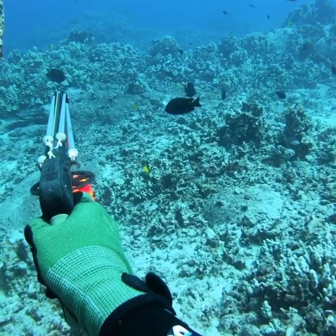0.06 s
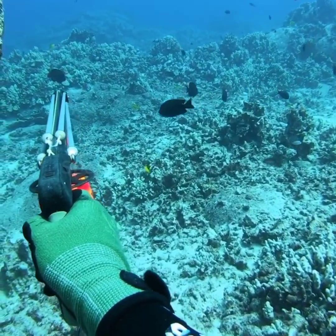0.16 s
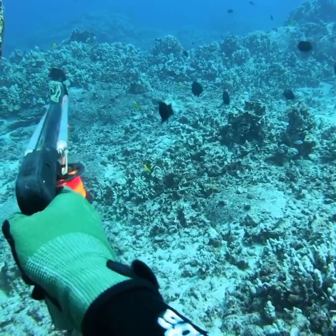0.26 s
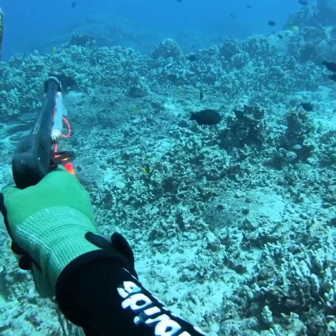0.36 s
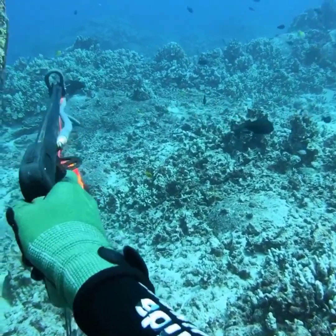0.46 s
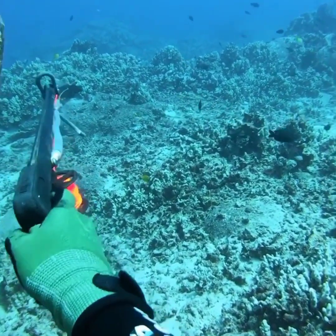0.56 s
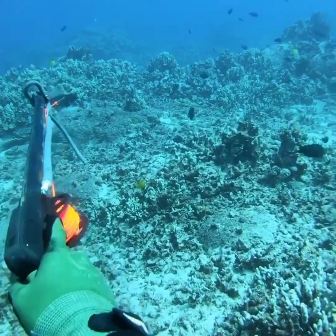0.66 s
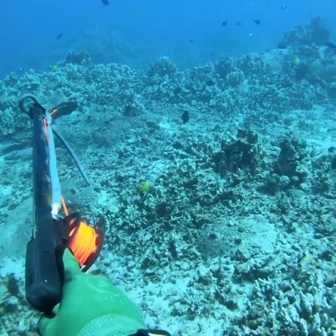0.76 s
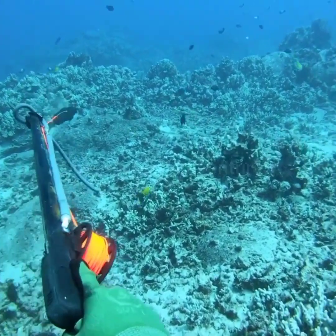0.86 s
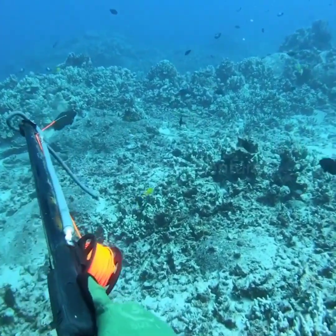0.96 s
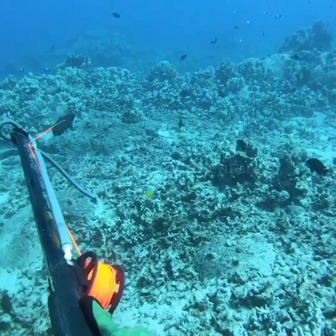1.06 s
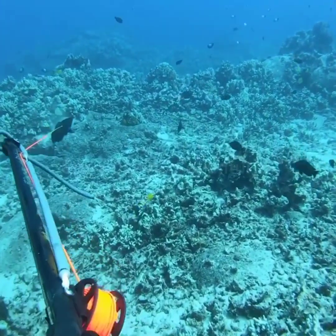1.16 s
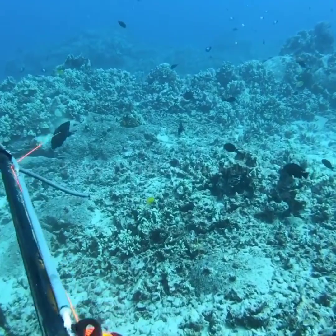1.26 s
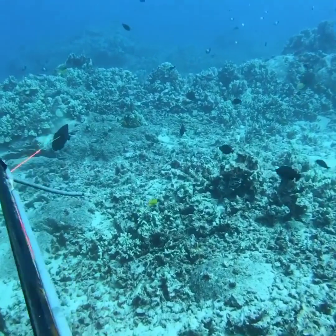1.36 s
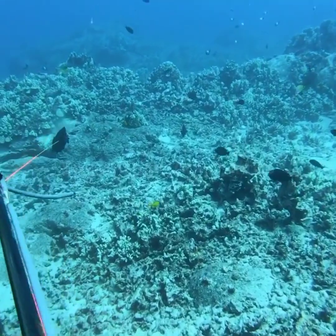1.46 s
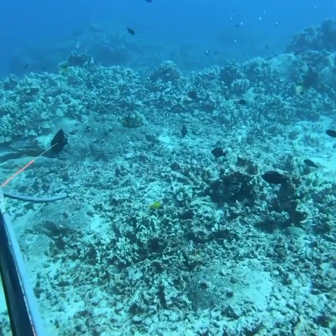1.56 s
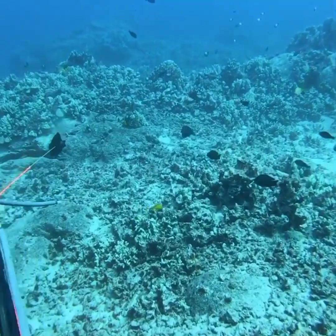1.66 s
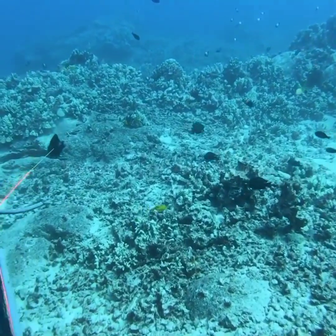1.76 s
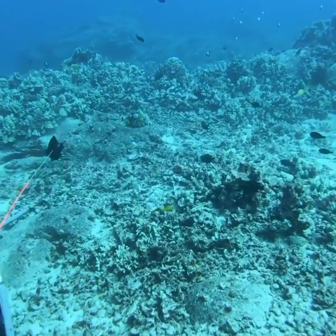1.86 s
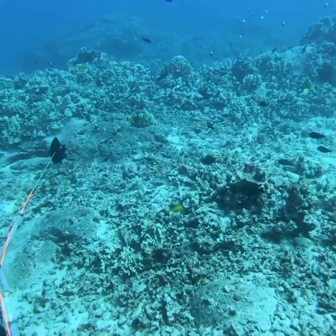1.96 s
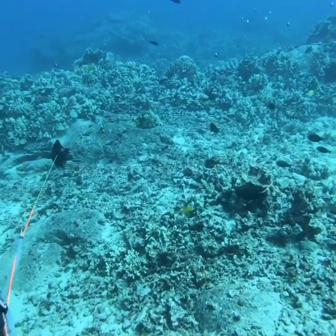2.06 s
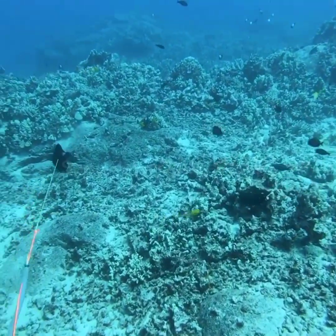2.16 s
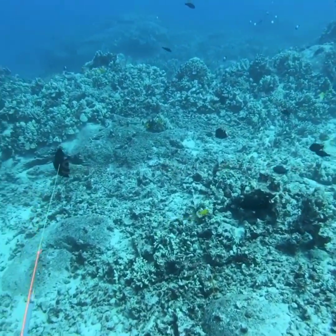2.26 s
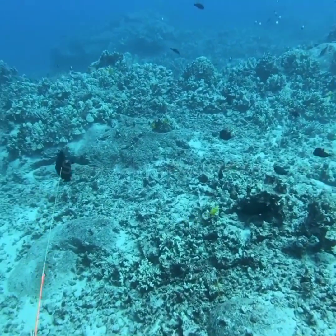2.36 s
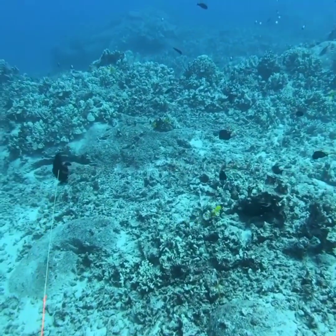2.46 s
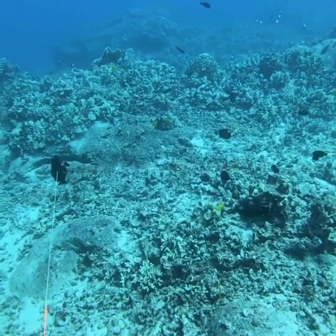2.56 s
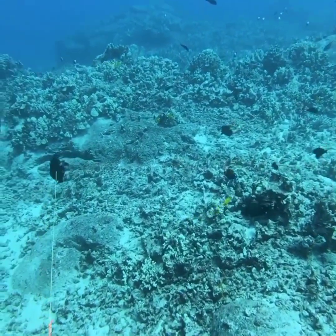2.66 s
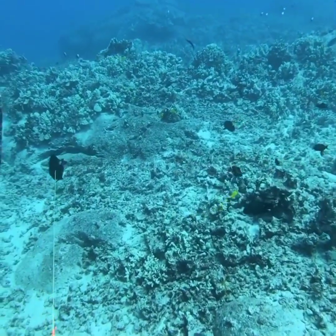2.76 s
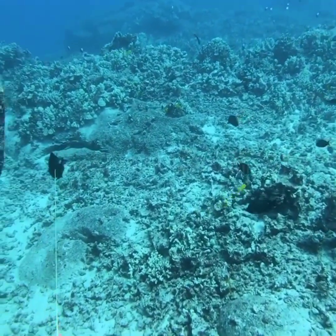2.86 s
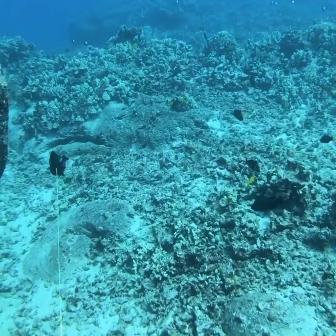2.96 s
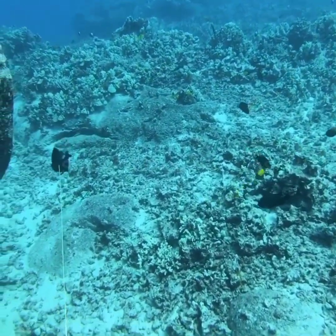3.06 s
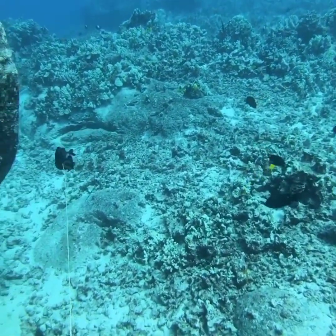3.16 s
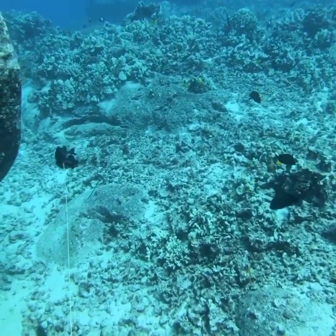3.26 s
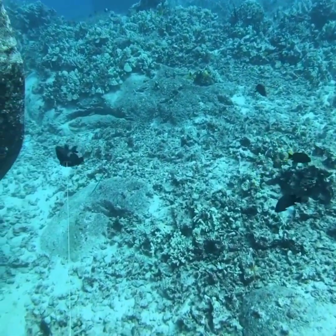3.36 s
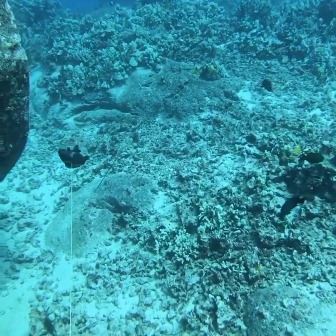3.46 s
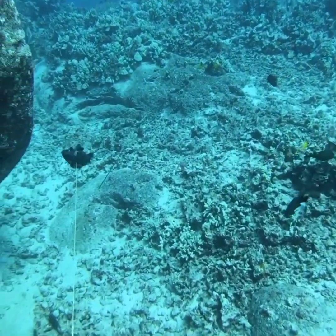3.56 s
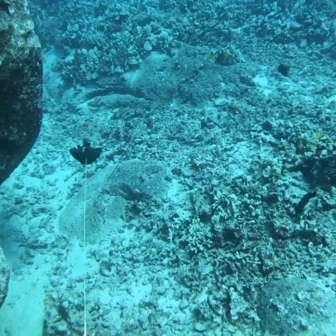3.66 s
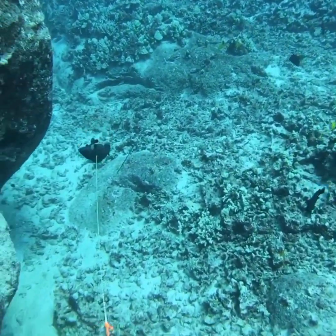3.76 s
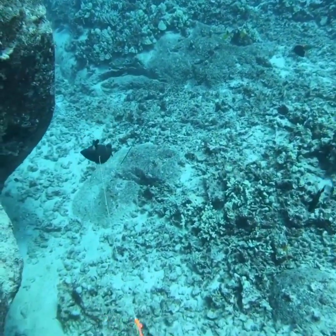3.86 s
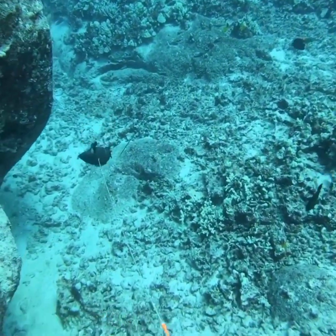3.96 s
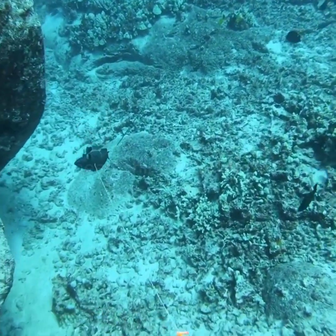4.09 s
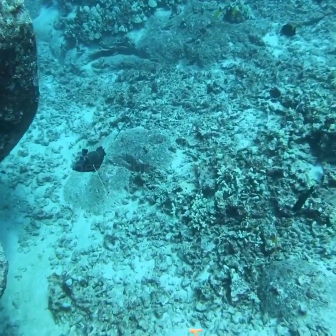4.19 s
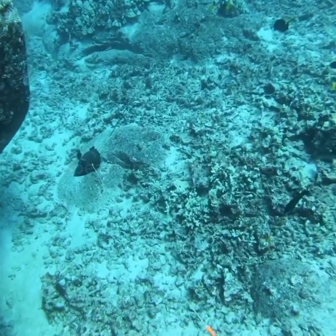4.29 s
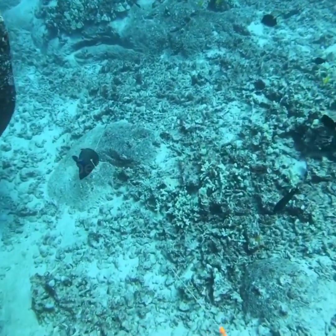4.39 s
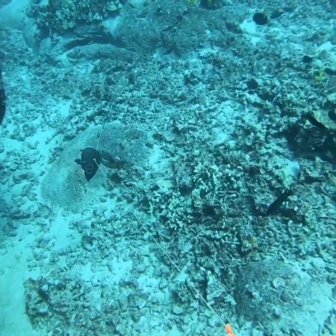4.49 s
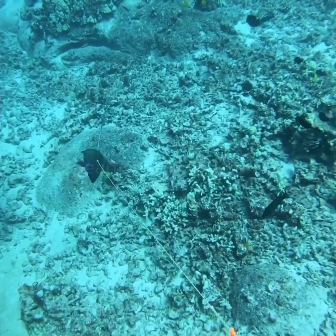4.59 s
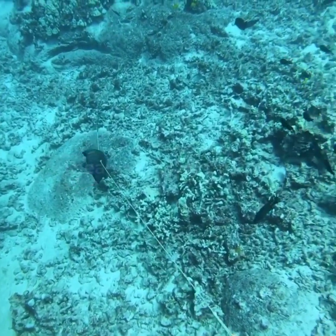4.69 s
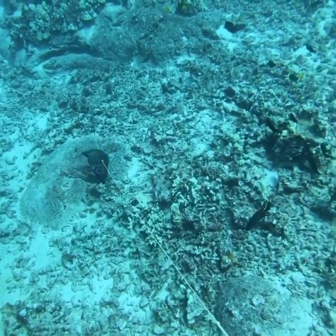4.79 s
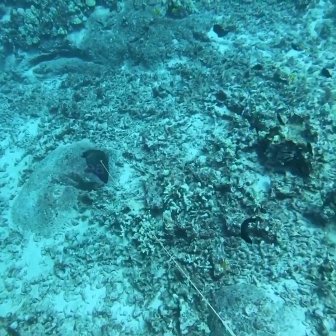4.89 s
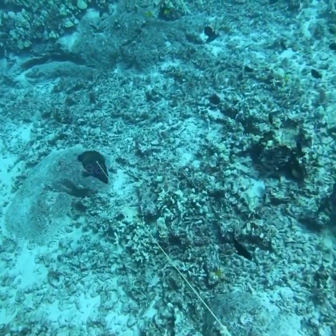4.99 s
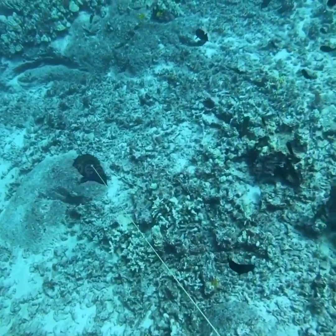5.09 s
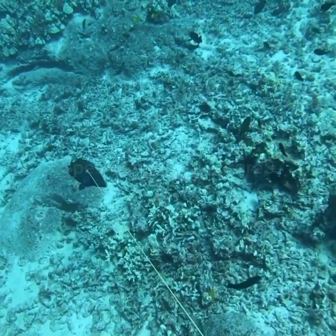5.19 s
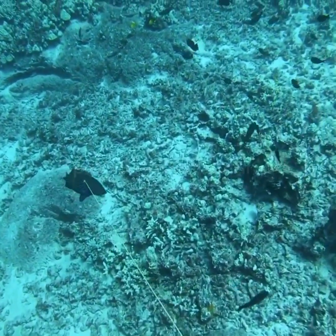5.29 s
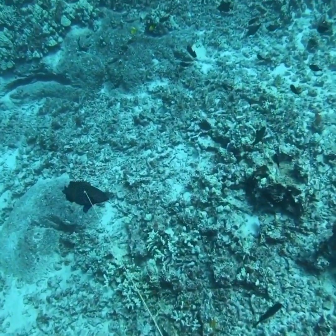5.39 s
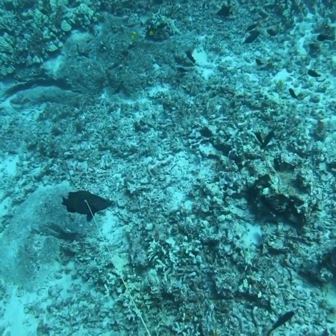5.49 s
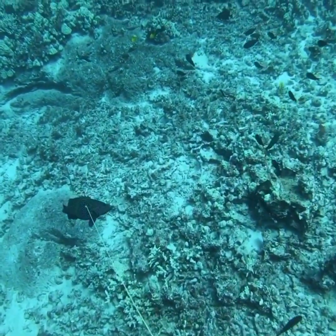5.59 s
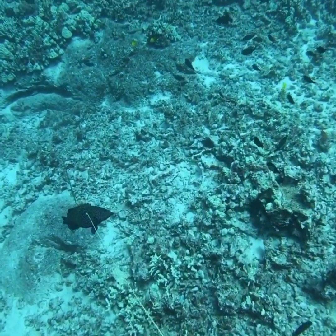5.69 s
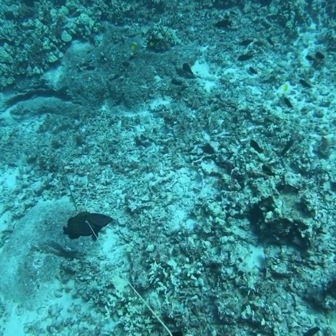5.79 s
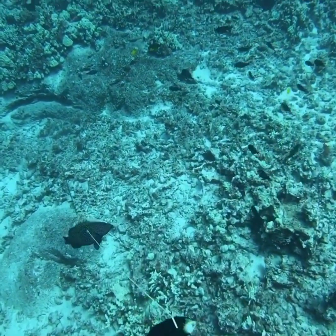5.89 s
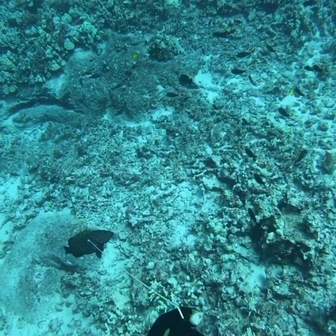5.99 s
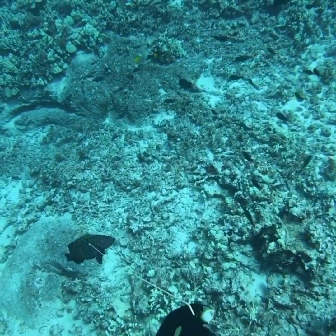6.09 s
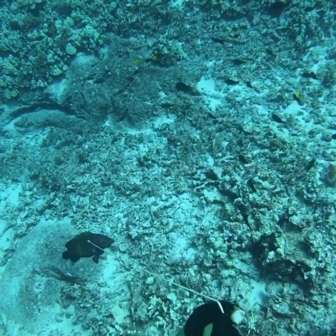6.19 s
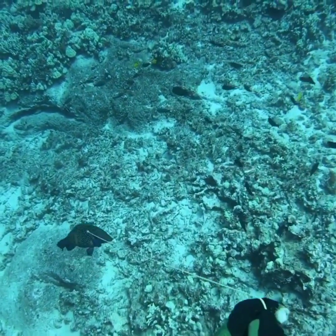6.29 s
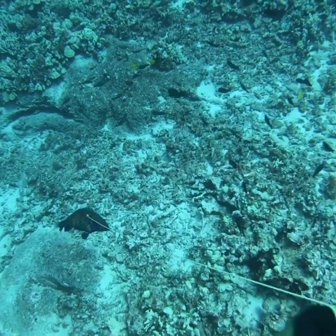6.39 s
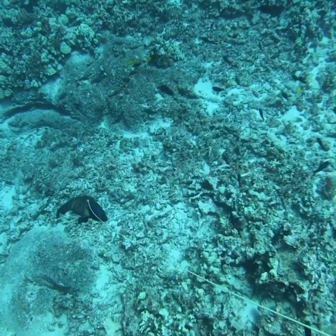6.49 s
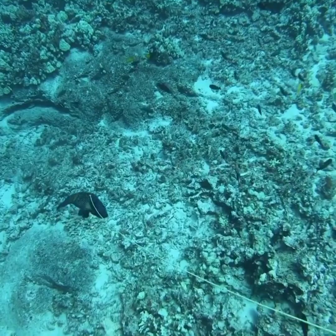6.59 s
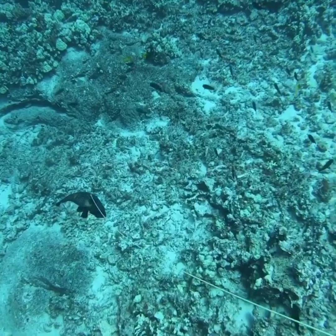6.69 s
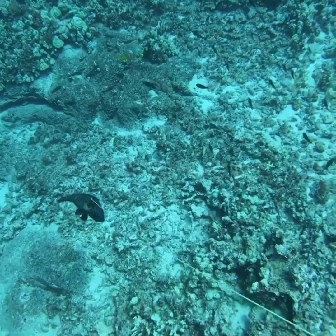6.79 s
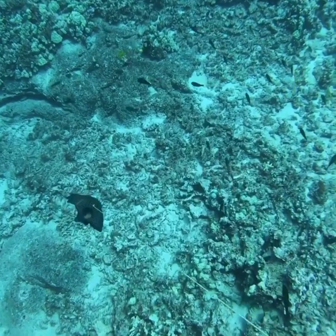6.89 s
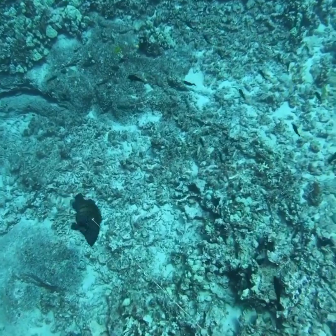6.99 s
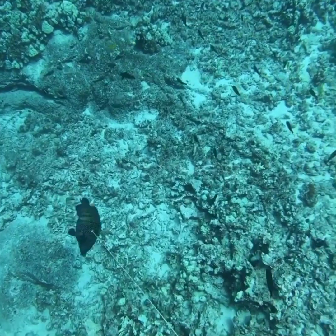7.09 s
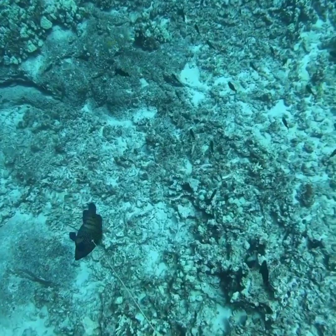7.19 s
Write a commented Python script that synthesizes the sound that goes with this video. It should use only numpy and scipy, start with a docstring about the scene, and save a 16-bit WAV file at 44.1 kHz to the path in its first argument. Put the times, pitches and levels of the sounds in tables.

```python
"""A speargun fires over a coral reef, an arm's length from a camera whose waterproof housing colours it all.
Over crackling shrimp the trigger cracks, the shaft scrapes down its track and the rubbers slap home.
The gun shudders, the steel rings on and the line hisses out. The shot ducks the camera's gain, and
the reef takes about two seconds to come back while the slack rubbers wobble. Then shrimp snap all around,
the diver's strokes rumble, line and rigging rasp and clink, and water and gear knock on the housing."""
import sys
import numpy as np
from scipy import signal
from scipy.fft import rfft, irfft
from scipy.io import wavfile
from scipy.ndimage import uniform_filter1d

SR = 44100
rng = np.random.default_rng(int(sys.argv[2]) if len(sys.argv) > 2 else 0)


def generate_wav(sig):
    """Save sig (samples, or channels by samples) to the path in sys.argv[1] as 16-bit PCM at SR."""
    pcm = np.round(np.clip(np.atleast_2d(sig).T, -1, 1) * 32767).astype(np.int16)
    wavfile.write(sys.argv[1], SR, pcm)


N = 319284
TIME = np.arange(N) / SR
BRIEF = TIME[:SR // 4]  # time axis of a one-shot

# hits inside the gun: (time [s], level [dB], rise [s], t60 [s], ring pitch [Hz], crack share [0-1],
# crack brightness [dB/octave])
GUN_HITS = [(0.3293, 23, 0.000078, 0.0046, 3000, 1, 0.5), (0.3321, 12, 0.00038, 0.011, 2050, 0.78, 1.5),
            (.3618, -3, .0008, .014, 2540, 0.5, -5), (0.3695, 11, 0.00092, 0.011, 2430, 0.3, 0.5),
            (.3745, 8, 0.00066, 0.012, 1880, 0.2, -10), (0.3779, 8.5, 0.00069, .012, 890, 0.3, -4),
            (0.3812, 12.5, 0.00065, 0.011, 1700, 0.4, 2.5), (0.3855, 12, 0.0009, 0.013, 1810, 0, -7),
            (0.3876, 19.5, 0.00045, 0.0075, 1690, 0.44, -1.5), (.3845, 3.5, 0.0035, 0.016, 726, 0, -5),
            (.3915, -1, .0005, .01, 2300, 0.8, 2.5), (.3958, -6, .0005, 0.0091, 2000, 0.9, -6.5),
            (.4335, -1.5, .0007, 0.041, 1910, .7, -1), (0.449, -1.5, 0.00081, 0.024, 1120, 0.44, -1)]
# tone of their crack: (frequency [Hz], level [dB])
CRACK_EQ = [(180, -31), (300, -5), (773, 5), (1090, -26), (1840, 2.5), (2850, 4.5), (4220, -13.5),
            (5220, -29), (5750, -11), (7110, -38), (8400, -15.5), (11000, -21), (12200, -32), (13500, -23),
            (14800, -69)]
# the shaft as the catch slips, as it starts off and at full speed: (hold from [s], until [s], level [dB])
SHAFT_SCRAPES = [(0.32, 0.33, -33), (0.334, 0.366, -15.5), (0.363, 0.388, -6)]
# tone of the shaft on its track: (frequency [Hz], level [dB])
TRACK_EQ = [(240, -40), (400, -36), (721, 1), (1220, -33), (1870, 0.5), (2140, -13), (2940, -4.5),
            (3470, -27), (3800, -25.5), (4920, -23), (6080, -16.5), (7280, -33), (9850, -26), (13700, -51),
            (14800, -100)]
# low thumps of the gun's shudder: (time [s], level [dB], pitch [Hz], t60 [s])
RECOIL_THUMPS = [(.3315, 9.5, 55, 0.15), (.329, -2, 170, 0.025), (0.48, -7.5, 61.5, 0.11),
                 (.389, 2.5, 62.5, 0.22), (0.42, -12, 205, 0.059), (.441, -11, 160, 0.048),
                 (0.469, -24, 170, 0.38)]
# partials of the steel shaft: (frequency [Hz], relative level [dB], t60 [s])
SHAFT_MODES = [(954, -9, 0.79), (1120, -10, 0.96), (1254, -7.5, 0.92), (1570, -11, 0.87), (1670, -7, 0.65),
               (1900, -1.5, 0.91), (1900, -17, 1), (2277, -2, 0.73), (2260, -13, 0.86), (2492, -7, 0.44),
               (2640, -12, 0.99), (2708, -9, 0.86), (2869, -6.5, 0.77)]
# rasp of the running line: (frequency [Hz], level [dB])
LINE_EQ = [(150, -36), (250, -10.5), (285, -17), (496, -19.5), (690, -2), (972, -3.5), (1460, -12.5),
           (1820, 1.5), (2020, -11), (2330, -3), (3500, -20), (4550, -64.5), (7700, -120)]
# fizz of the bubbles in the wake: (frequency [Hz], level [dB])
FIZZ_EQ = [(1880, -16), (3200, -2), (5980, -11.5), (6540, -18), (9860, -17), (13200, -36), (13900, -34),
           (14500, -81)]
# swings of the slack rubbers: (hold from [s], until [s], level [dB])
RUBBER_SWINGS = [(.925, 0.93, -32), (0.995, 1.02, -40), (1.16, 1.18, -53), (1.675, 1.696, -49.5)]
# hollow knocks on the housing: (time [s], level [dB], pitch [Hz], clack share [0-1])
HOUSING_KNOCKS = [(1.833, -32.5, 630, 0.1), (2.041, -28.5, 717, 0.35), (2.166, -35.5, 700, 0.17),
                  (2.225, -29.5, 680, 0.26), (2.605, -28.5, 666, 0.23), (2.631, -26, 650, 0.63),
                  (2.6595, -26.5, 630, 0.42), (2.988, -29, 765, 0.45), (3.546, -14.5, 587, 0.19),
                  (3.5492, -19.5, 649, 0.13), (3.824, -23, 756, 0.27), (4.185, -24, 670, 0),
                  (4.239, -27, 645, 0.07), (4.497, -28.5, 630, 0.56), (4.657, -20, 760, 0.62),
                  (4.841, -23.5, 717, 0.57), (5.5238, -17.5, 790, 1), (5.5261, -20.5, 890, 0.86),
                  (5.5318, -23, 654, 0.55), (5.5378, -28.5, 526, 0.9), (5.861, -38, 716, 0.4),
                  (5.897, -24, 840, 0.33), (5.942, -31, 900, 0.2), (6.124, -30.5, 740, 0.44),
                  (6.4148, -37, 795, 0.7), (6.418, -18.5, 950, 0.62), (6.4645, -31.5, 824, .3),
                  (7.031, -32.5, 635, 0.05), (7.168, -30.5, 655, 0)]
# tone of their clack: (frequency [Hz], level [dB])
CLACK_EQ = [(80, -32.5), (190, -1.5), (300, -9), (440, -19.5), (720, 12.5), (1150, -7), (1500, -8.5),
            (2000, -8.5), (3000, -35), (6000, -62)]
# dull bumps of body and gun: (time [s], level [dB], pitch [Hz])
BODY_BUMPS = [(1.729, -31.5, 177), (2.828, -32.5, 182), (3.19, -33, 180), (3.539, -36, 267),
              (4.467, -39.5, 194), (4.705, -38, 185), (4.835, -45, 193), (5.26, -38, 153),
              (5.524, -32, 340), (5.528, -20.5, 180), (6.425, -35, 105), (7.084, -31, 165)]
# clinks of reel and rigging: (time [s], level [dB], pitch [ratio], rise [s], brightness [dB/octave],
# relative level of the contact tick [dB])
RIGGING_CLINKS = [(1.867, -29.5, 0.97, 0.0028, -19, -6), (1.894, -30.5, 1, 0.0025, -4, 6),
                  (1.906, -36, 1.05, .002, -5, 6), (2.2238, -34, .99, .001, -10, 3),
                  (2.6478, -27, 0.94, 0.00071, -22, -14), (2.852, -33, 0.94, 0.0018, -18, -13),
                  (5.3711, -33, 0.94, 0.0011, -5, 1.5), (5.4783, -37.5, 0.8, 0.00037, 0, 7),
                  (5.4895, -37.5, 1.1, .0005, 10, 7), (6.4178, -33, 0.68, 0.00082, -6, 1.5),
                  (6.4812, -24.5, 0.96, 0.0027, -7, -9), (6.486, -29, 1.1, 0.0059, -2, 7),
                  (6.4915, -31.5, 1, 0.0022, 0, 4.5), (6.5135, -33, 1.05, .001, -2, 7),
                  (6.8676, -39, 1.15, 0.0038, 10, 9.5), (7.069, -24, 0.96, 0.00013, 3, 6.5),
                  (7.192, -31, 0.92, .001, -9, -7)]
# partials of the rigging's metal: (frequency [Hz], relative level [dB], t60 [s])
CLINK_MODES = [(1896, -7, 0.055), (2450, -8, 0.025), (2610, -9.5, 0.052), (3980, -23, 0.055),
               (4740, -18.5, 0.026), (5890, -29, 0.022)]
# tone of the contact tick: (frequency [Hz], level [dB])
TICK_EQ = [(530, -14.5), (750, 9), (1200, -18), (1920, 6.5), (2500, 1), (3300, -14), (3850, -0.5),
           (5270, -35), (6000, -5), (6540, -26), (12000, -27), (15600, -54)]
# brief rasps of fine crackle as line and rigging drag: (hold from [s], until [s], level [dB])
RIGGING_RASPS = [(1.868, 1.9, -59), (2.41, 2.436, -63), (3.99, 4.018, -56.5), (5.25, 5.326, -56),
                 (6.052, 6.063, -55), (6.476, 6.511, -52), (6.853, 6.898, -60), (7.07, 7.118, -60)]
# the diver's strokes: (hold from [s], until [s], water rumble [dB], glove rub [dB])
DIVER_STROKES = [(.15, .3, -78, -88), (0.75, 0.778, -38, -52), (0.966, 1.115, -43.5, -65),
                 (1.212, 1.303, -55, -66), (2.63, 2.753, -46.5, -58), (3.238, 3.31, -56, -50),
                 (3.395, 3.436, -38, -56), (3.566, 3.938, -48, -72), (4.035, 4.277, -46.5, -67.5),
                 (4.51, 4.573, -48, -72), (4.683, 4.742, -53, -58), (4.86, 4.933, -59, -62),
                 (5.265, 5.55, -50.5, -60.5), (5.916, 6.315, -58, -71), (6.375, 6.49, -44.5, -58),
                 (6.546, 6.927, -53.5, -76), (7.07, 7.24, -61, -58)]
# sub rumble of eddies: (frequency [Hz], level [dB])
RUMBLE_EQ = [(8, -34.5), (16, 14.5), (35, -2), (65, -1), (100, -15), (140, -14), (300, -55)]
# muffled rubbing: (frequency [Hz], level [dB])
RUB_EQ = [(70, -44), (130, -5.5), (185, 4.5), (240, -4.5), (320, -13.5), (450, -13), (700, -37),
          (1500, -84)]
# close shrimp: (time [s], level [dB], brightness [dB/octave])
CLOSE_SNAPS = [(1.033, -32.5, -6), (1.063, -38, 9), (1.48, -38.5, 2), (1.6025, -30, -1), (2.405, -40, 5),
               (2.424, -36, -2), (2.5023, -37, 6), (4.1598, -36, -3), (4.3937, -33.5, -2.5),
               (4.476, -40, 2), (4.8925, -30.5, -4), (4.967, -31.5, 6.5), (5.228, -32, -5),
               (5.271, -37, -4), (5.291, -39.5, 5), (5.478, -31, -2.5), (5.521, -33, -3), (5.532, -33, -2),
               (5.784, -35, -6), (5.8227, -36, 3), (6.2448, -33.5, 9), (6.4646, -31, 5), (6.752, -36.5, 2),
               (7.094, -36, -1)]
# tone of one snap: (frequency [Hz], level [dB])
SNAP_EQ = [(880, -6), (1500, 0), (2470, 9), (4430, 2), (5790, 12), (8260, -0.5), (9630, 1.5),
           (12100, -20.5), (13600, -11), (14800, -43)]
# slow fader moves of the reef bed: (time [s], shrimp mids [dB], shrimp treble [dB], slosh [dB])
REEF_LEVELS = [(0, -50.5, -55.5, -52), (1.1, -49, -55.5, -50), (1.9, -53.5, -59, -50),
               (2.6, -50, -57, -48.5), (3.7, -52, -57.5, -46), (4.3, -50.5, -57, -44),
               (5.35, -50, -54.5, -47.5), (5.9, -49, -55.5, -46.5), (7.24, -49, -55, -47)]
# mids of the shrimp bed: (frequency [Hz], level [dB])
SHRIMP_MID_EQ = [(620, -36.5), (1050, -9), (1250, -10.5), (1600, -2.5), (1750, -1), (1880, 8), (2090, -10),
                 (2350, 0), (2700, -4.5), (3260, -17), (3780, -7), (4500, -22.5), (6000, -34.5)]
# sizzle of fine crackle, for the shrimp bed and the rigging rasps: (frequency [Hz], level [dB])
SIZZLE_EQ = [(2530, -34), (3600, -15), (4500, -18), (4950, -4.5), (5950, 7), (6900, -7), (7500, -6.5),
             (7900, -9.5), (8280, -0.5), (8790, -11), (9300, -4), (10300, -7), (10800, -18.5), (11400, -17),
             (12100, -22), (13100, -19), (13900, -30), (14800, -32)]
# water sloshing on the housing: (frequency [Hz], level [dB])
SLOSH_EQ = [(220, -50.5), (380, -20), (428, -25.5), (486, -21), (536, -8.5), (656, 5), (857, -2.5),
            (1140, -23.5), (1260, -26), (1400, -17), (1820, -13.5), (3080, -120)]
# how the walls feed the two microphones: (frequency [Hz], side over mid [dB], lean to the left [-1..1])
HOUSING_WALLS = [(50, -42, -0.29), (193, -11.5, -0.0098), (383, -3, -0.096), (657, -7.5, -0.73),
                 (890, 2.5, -0.79), (1190, 9, -0.032), (1430, -1.5, -0.19), (1550, -10, -0.86),
                 (1990, -6.5, 0.2), (2240, 2, -0.21), (2820, -3, -0.23), (4840, 4.5, -0.17),
                 (6300, -7, 0.21), (7260, 5, -0.012), (9270, -3, -0.32), (14000, -2, 0.069)]

RELEASE_S, LEAVES_S = 0.333, 0.387  # the rubbers let go; the spear leaves the gun


def gun_hits():
    """Trigger and rubbers strike the gun: each hit blends a noisy crack with a short ring."""
    out = np.zeros((2, N))
    for s, db, rise, t60, hz, share, bright_db in GUN_HITS:
        crack = burst(tilted(CRACK_EQ, bright_db), t60, rise)
        add(out, s, undb(db) * (share * crack + (1 - share) * ring(hz, t60, rise)))
    return out


def shaft_scrape():
    """The shaft chatters along its track, louder as it gathers speed."""
    level = swells(SHAFT_SCRAPES, attack_s=0.0056, fall_db_per_s=1891)
    return level * texture(TRACK_EQ, per_s=5300, spread_db=0, blur=0.6)


def water_churn():
    """The rubbers whip the water into eddies: the low end of the shot."""
    eddies = noise(RUMBLE_EQ) + undb(-10.5) * noise(RUB_EQ)
    return undb(-6) * envelope(RELEASE_S, LEAVES_S, attack_s=0.002, fall_db_per_s=138) * eddies


def recoil():
    """The gun kicks back and shudders; the thumps are inverted because the pressure drops first."""
    out = np.zeros((2, N))
    for s, db, hz, t60 in RECOIL_THUMPS:
        add(out, s, -undb(db) * ring(hz, t60, rise=0.0029))
    return out


def line_rasp():
    """The line rasps out, ever more quietly as the water brakes the spear."""
    rasp = texture(LINE_EQ, per_s=1100, spread_db=0.2, blur=0.71)
    running = envelope(LEAVES_S + 0.056, LEAVES_S + 0.05, attack_s=0.056, fall_db_per_s=65)
    return running * undb(-13 + 1.44 * drift(109.5)) * reverberate(rasp, t60=0.35, wet_db=-3.5)


def wake_fizz():
    """Fine bubbles fizz in the spear's wake."""
    wake = envelope(LEAVES_S, LEAVES_S + 0.025, attack_s=0.0049, fall_db_per_s=79)
    return undb(-24.5) * wake * texture(FIZZ_EQ, per_s=4300, spread_db=-3, blur=0.79)


def shaft_ring():
    """Clear of the gun, the steel shaft rings on: the metallic tail of the shot."""
    out, t = np.zeros((2, N)), TIME[:2 * SR]
    for hz, db, t60 in SHAFT_MODES:
        partial = np.sin(2 * np.pi * (hz * t + rng.random((2, 1))))
        add(out, LEAVES_S, undb(db) * decay(t, t60) * partial)
    return undb(-17.5) * out


def rubber_wobble():
    """The slack rubbers swing in the water: a wavering bass tone that swells and settles."""
    hz = 55 * (1 + 0.132 * drift(40.5))
    return swells(RUBBER_SWINGS, attack_s=0.036, fall_db_per_s=125) * np.sin(2 * np.pi * np.cumsum(hz) / SR)


def housing_knocks():
    """Water and gear knock on the housing: a hollow ring blended with a clack."""
    out = np.zeros((2, N))
    for s, db, hz, share in HOUSING_KNOCKS:
        t60 = 0.035 * (690 / hz) ** 2.4  # higher knocks die sooner
        clack = burst(CLACK_EQ, t60, rise=0.00095)
        add(out, s, undb(db) * (share * clack + (1 - share) * ring(hz, t60, rise=0.0015)))
    return out


def body_bumps():
    """Body and gun bump the housing: a dull note, a scuff and a bass thud underneath."""
    out = np.zeros((2, N))
    thud = undb(-18) * ring(hz=61.3, t60=0.19, rise=0.0084)
    for s, db, hz in BODY_BUMPS:
        scuff = 0.5 * burst(RUB_EQ, t60=0.035, rise=0.0007)
        add(out, s, undb(db) * (ring(hz, t60=0.035, rise=0.0038) + scuff + thud))
    return out


def rigging_clinks():
    """Reel and rigging touch: a contact tick, ringing metal and a short tail."""
    out = np.zeros((2, N))
    for s, db, pitch, rise, bright_db, tick_db in RIGGING_CLINKS:
        modes = tilted(CLINK_MODES, bright_db)
        metal = sum(undb(mode_db) * ring(pitch * hz, t60, rise) for hz, mode_db, t60 in modes)
        tick = undb(tick_db) * burst(TICK_EQ, t60=0.012, rise=rise)
        add(out, s, undb(db) * (metal + tick))
    return reverberate(out, t60=0.24, wet_db=-11)


def rigging_rasps():
    """Line and rigging drag in brief rasps of fine crackle."""
    drag = swells(RIGGING_RASPS, attack_s=0.0072, fall_db_per_s=350)
    return sizzle(drag * crackle(per_s=900, spread_db=4, blur=0.8))


def diver_strokes():
    """With every stroke eddies rumble past the camera and the glove rubs on the gear."""
    flow, grip = undb(-65), undb(-66)  # the floor between strokes
    for start, end, rumble_db, rub_db in DIVER_STROKES:
        stroke = envelope(start, end, attack_s=0.075, fall_db_per_s=195)
        flow = np.hypot(flow, undb(rumble_db) * stroke)
        grip = np.hypot(grip, undb(rub_db) * stroke)
    rumble = flow * undb(1.6 * drift(20)) * noise(RUMBLE_EQ)
    rub = grip * undb(3.7 * drift(8.1)) * texture(RUB_EQ, per_s=300, spread_db=0.5, blur=0.97)
    return rumble + rub


def shrimp_snaps(faint_per_s=4, faint_db=-51):
    """Single shrimp snap close by, with fainter ones scattered at random, no two alike."""
    gaps, sizes, shades = rng.random((96, 3)).T
    times = np.cumsum(-np.log(1 - gaps)) / faint_per_s
    faint = [(s, faint_db + 10 * (size - 0.5), 6 * (shade - 0.4))
             for s, size, shade in zip(times, sizes, shades) if s < TIME[-1]]
    out = np.zeros((2, N))
    for s, db, bright_db in CLOSE_SNAPS + faint:
        add(out, s, undb(db) * burst(tilted(SNAP_EQ, bright_db), t60=0.021, rise=0.00098))
    return out


def shrimp_bed():
    """Distant shrimp blur into a gently swelling crackle, with a grit of nearer ones on top."""
    mid_db, treble_db = fader(REEF_LEVELS, column=1), fader(REEF_LEVELS, column=2)
    waves = undb(0.8 * drift(3.7))
    far = waves * reverberate(crackle(per_s=1800, spread_db=3, blur=1), t60=0.037, wet_db=-5)
    fine = waves * undb(treble_db - 0.3 + 1.5 * drift(12)) * crackle(per_s=1100, spread_db=3, blur=1)
    mids = undb(mid_db + 1.58 * drift(22)) * unit(colour(far, SHRIMP_MID_EQ))
    grit = undb(treble_db - 10.5) * texture(tilted(SNAP_EQ, 3), per_s=110, spread_db=1.5, blur=0)
    return mids + sizzle(fine) + grit


def slosh():
    """Water sloshes softly round the housing."""
    level = undb(fader(REEF_LEVELS, column=3) + drift(14))
    return level * texture(SLOSH_EQ, per_s=900, spread_db=1.1, blur=1)


def housing_stereo(paths):
    """The walls move both microphones together in the bass, and with or against each other higher up."""
    direct, scattered = rfft(paths)
    side_db, lean = across(HOUSING_WALLS, N)
    side = undb(side_db) * (lean * direct + np.sqrt(1 - lean ** 2) * scattered)
    return irfft(np.array([direct + side, direct - side]), N)


def gain_control(x, threshold_db=-11.5, max_cut_db=19.5, release_db_per_s=11.5):
    """Peaks over the threshold duck the gain at once; it creeps back at a steady rate."""
    peak_db = 20 * np.log10(np.abs(x).max(axis=0) + 1e-9)
    over_db = np.clip(peak_db - threshold_db, 0, max_cut_db)
    released_db = release_db_per_s * TIME
    cut_db = np.maximum.accumulate(over_db + released_db) - released_db
    return x * undb(-uniform_filter1d(cut_db, size=16))


def undb(db):
    """Decibels to gain."""
    return 10 ** (np.asarray(db) / 20)


def unit(x):
    """Scale to rms 1."""
    return x / np.sqrt(np.mean(x ** 2))


def add(out, s, x):
    """Mix x into out at s seconds."""
    i = int(s * SR)
    out[:, i:i + x.shape[1]] += x[:, :N - i]


def fader(rows, column):
    """One column of a timed table, joined by straight lines."""
    rows = np.array(rows)
    return np.interp(TIME, rows[:, 0], rows[:, column])


def drift(per_s):
    """Smooth random modulation with rms 1."""
    hold = int(SR / per_s)
    steps = np.repeat(rng.standard_normal(N // hold + 1), hold)
    return unit(uniform_filter1d(uniform_filter1d(steps, hold), hold)[:N])


def envelope(start, end, attack_s, fall_db_per_s):
    """Fades in up to start, holds at 1 until end, then dies away."""
    attack = np.clip(1 + (TIME - start) / attack_s, 0, 1)
    return attack * undb(-np.clip(fall_db_per_s * (TIME - end), 0, 300))


def swells(rows, attack_s, fall_db_per_s):
    """One envelope a row, summed at their levels."""
    return sum(undb(db) * envelope(start, end, attack_s, fall_db_per_s) for start, end, db in rows)


def decay(t, t60):
    """Falls 60 dB in t60 seconds."""
    return np.exp(-np.log(1000) * t / t60)


def hit_envelope(t60, rise):
    """A rounded attack and a decay, with peak 1."""
    shape = (1 - np.exp(-(BRIEF / rise) ** 2)) * decay(BRIEF, t60)
    return shape / shape.max()


def ring(hz, t60, rise):
    """A damped tone; its two paths are a quarter cycle apart."""
    phase = 2 * np.pi * hz * BRIEF
    return hit_envelope(t60, rise) * np.array([np.sin(phase), -np.cos(phase)])


def burst(eq, t60, rise):
    """A coloured noise hit that peaks near 1."""
    shape = hit_envelope(t60, rise)
    x = colour(shape * rng.standard_normal((2, len(BRIEF))), eq)
    return 0.5 * x * np.linalg.norm(shape) / np.linalg.norm(x, axis=1, keepdims=True)


def crackle(per_s, spread_db, blur):
    """Tiny clicks of uneven size over a blur of distant ones, by two paths through the housing."""
    size = undb(spread_db * np.minimum(rng.exponential(size=N), 5))
    clicks = (rng.random(N) < per_s / SR) * size * rng.standard_normal((2, N))
    return unit(unit(clicks) + blur * rng.standard_normal((2, N)))


def texture(eq, per_s, spread_db, blur):
    """Coloured crackle with rms 1."""
    return unit(colour(crackle(per_s, spread_db, blur), eq))


def sizzle(x):
    """Smears crackle and leaves its treble, at the same rms."""
    return x.std() * unit(colour(reverberate(x, t60=0.04, wet_db=-2.5), SIZZLE_EQ))


def noise(eq):
    """Coloured noise with rms 1."""
    return unit(colour(rng.standard_normal((2, N)), eq))


def tilted(rows, db_per_octave):
    """A frequency table made brighter or duller about 2 kHz."""
    return [(hz, db + db_per_octave * np.log2(hz / 2000), *rest) for hz, db, *rest in rows]


def across(rows, size):
    """The columns of a frequency table spread over FFT bins."""
    hz, *columns = np.transpose(rows)
    bins = np.log(np.maximum(np.fft.rfftfreq(size, 1 / SR), 1))
    return [np.interp(bins, np.log(np.sort(hz)), column) for column in columns]


def colour(x, eq, size=4096):
    """Minimum-phase EQ, so nothing rings ahead of a transient."""
    cepstrum = irfft(np.log(undb(across(eq, size)[0])))
    cepstrum[1:size // 2] *= 2
    cepstrum[size // 2 + 1:] = 0
    response = irfft(np.exp(rfft(cepstrum)))
    return signal.oaconvolve(x, response[None], axes=1)[:, :x.shape[1]]


def reverberate(x, t60, wet_db):
    """A dense thicket of short resonances on top of the direct sound."""
    tail = decay(BRIEF, t60) * rng.standard_normal((2, len(BRIEF)))
    wet = signal.oaconvolve(x, tail / np.linalg.norm(tail[0]), axes=1)[:, :N]
    return (x + undb(wet_db) * wet) / np.hypot(1, undb(wet_db))


def scene():
    """The shot, the spear's flight, the reef and the close details, all heard through the housing."""
    gun = shaft_scrape() + water_churn() + gun_hits() + recoil() + rubber_wobble()
    flight = line_rasp() + wake_fizz() + shaft_ring()
    reef = shrimp_bed() + slosh() + shrimp_snaps()
    close = diver_strokes() + housing_knocks() + body_bumps() + rigging_clinks() + rigging_rasps()
    return housing_stereo(gun + flight + reef + close)


def record(dry):
    """The camera ducks its gain, clips at full scale and cuts the top above 14.7 kHz."""
    low_pass = signal.ellip(12, 0.2, 90, 14700, fs=SR, output="sos")
    return signal.sosfilt(low_pass, np.clip(gain_control(dry), -1, 1))


dry = scene()
out = record(dry)
generate_wav(out)
```